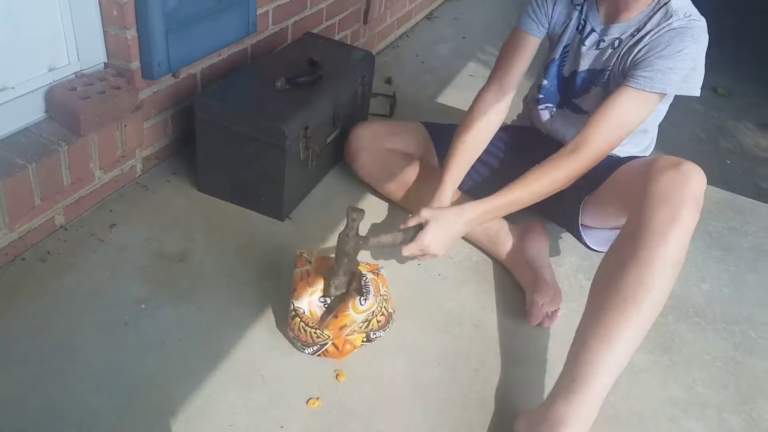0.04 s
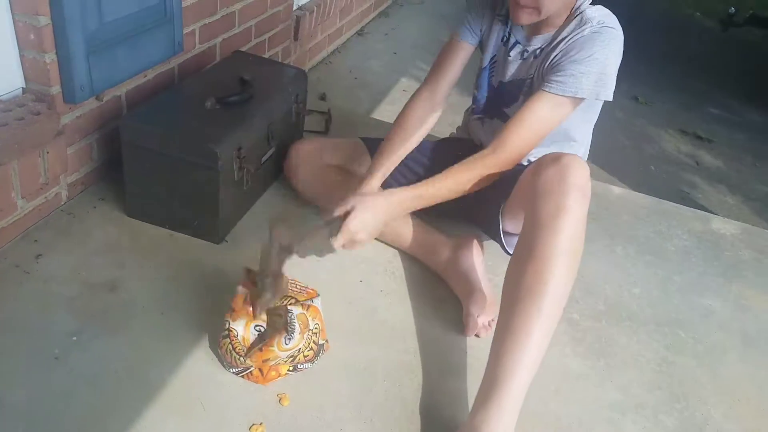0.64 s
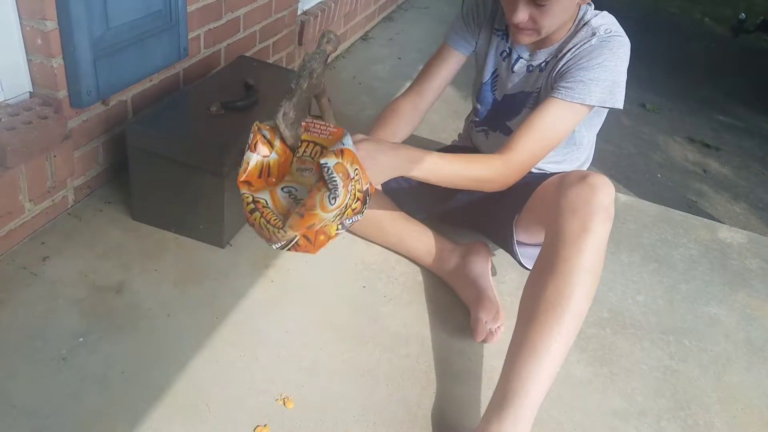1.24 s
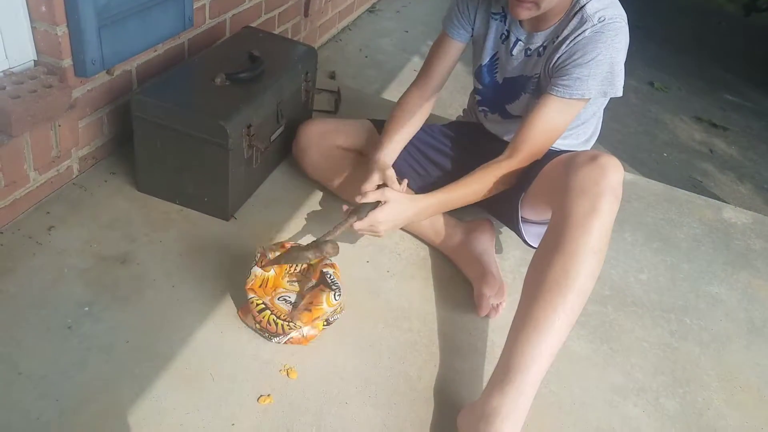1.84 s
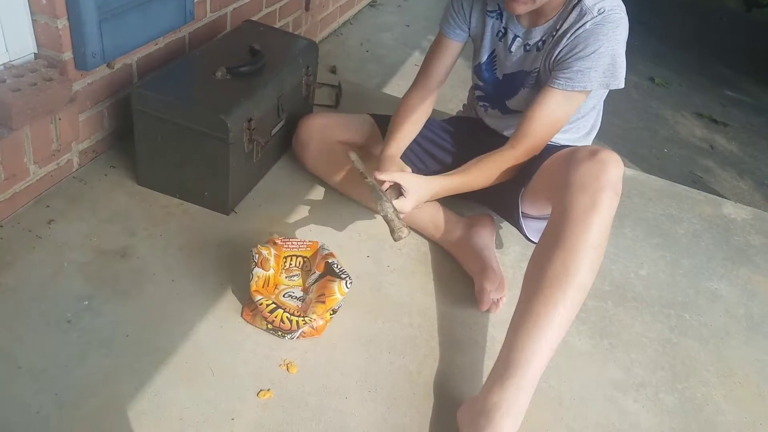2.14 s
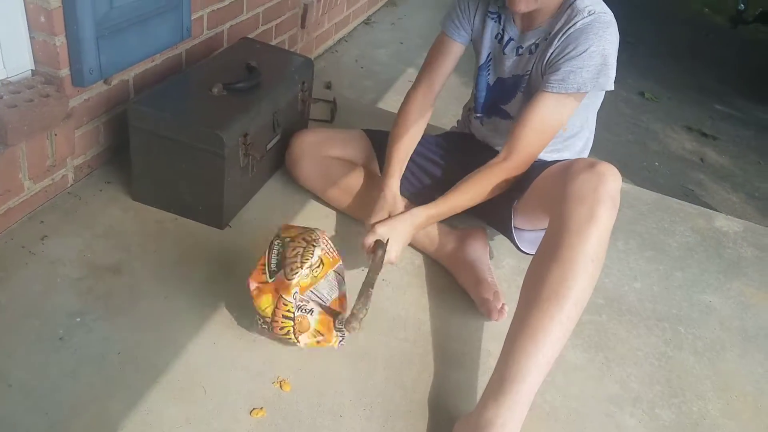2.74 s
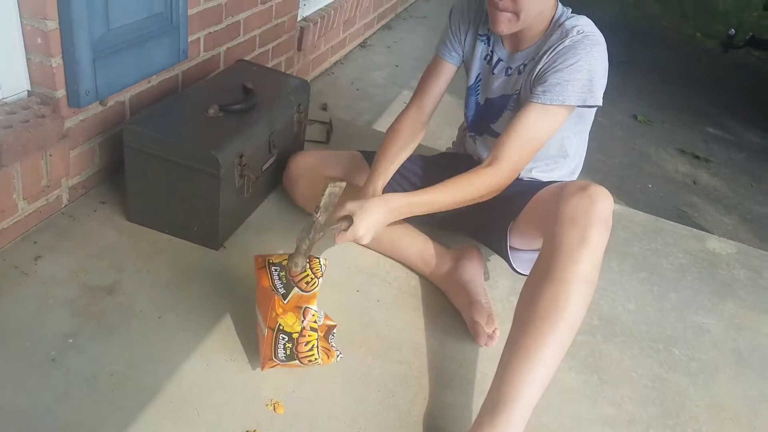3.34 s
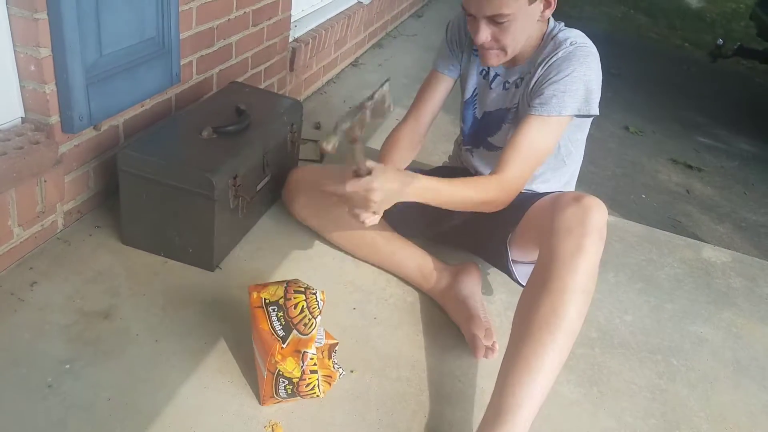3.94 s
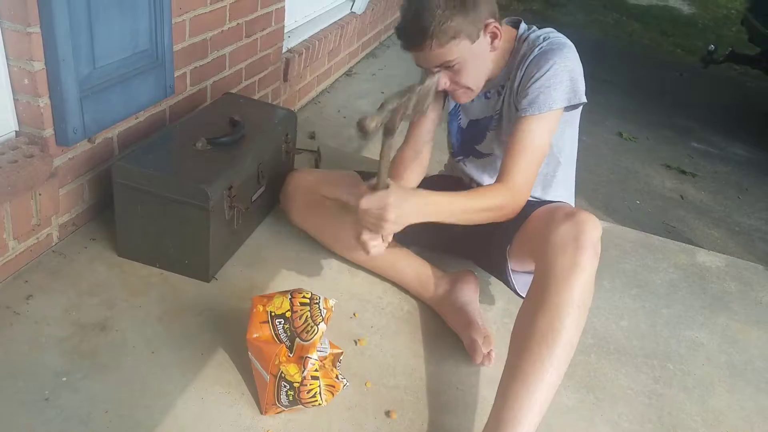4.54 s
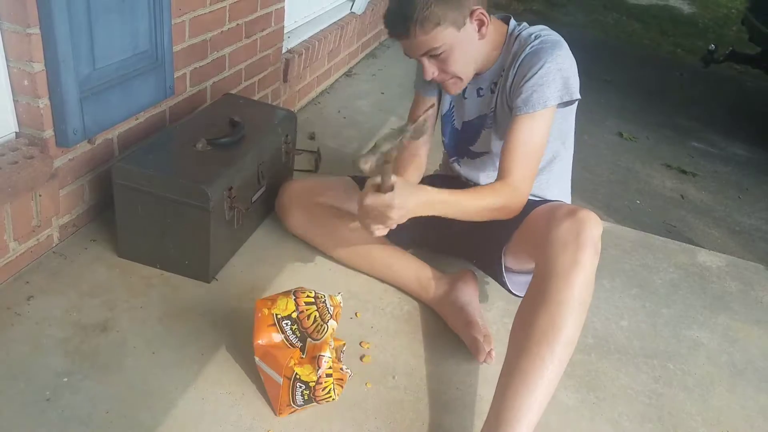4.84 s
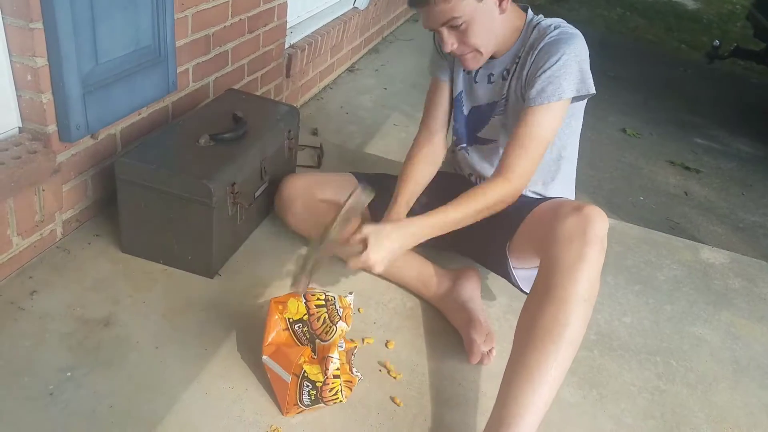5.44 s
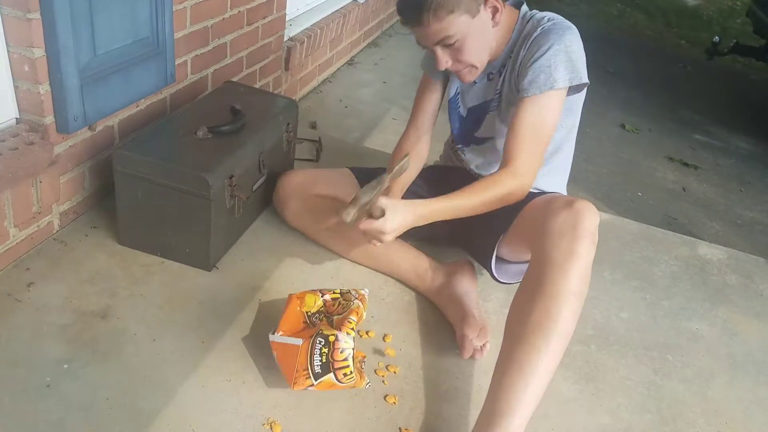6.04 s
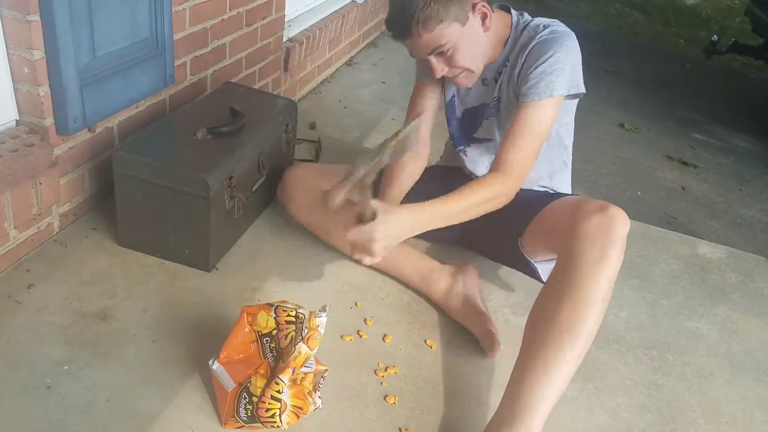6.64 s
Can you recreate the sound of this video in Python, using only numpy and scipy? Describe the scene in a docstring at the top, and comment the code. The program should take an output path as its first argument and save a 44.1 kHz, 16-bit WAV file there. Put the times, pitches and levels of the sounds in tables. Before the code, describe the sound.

A hatchet strikes a foil bag of crackers on a concrete porch right at the start, with a sharp crunch, a hollow thud and a faint steel ring, followed by a hard click. Another blow lands at 0.7 seconds, and the bag is flung up, rustling, and drops softly around 1 second. A blow at 1.5 seconds is followed by crinkling and a brief lull. At 2.7 seconds the hatchet hits again and the bag tumbles, knocking and crunching on the floor around 3 seconds. From 3.3 to 6.4 seconds come eight steady chops, about two a second, with foil crackling and crumbs ticking between them. The bag is close and slightly left, with a short echo from the wall. Far traffic hums faintly throughout, and a distant engine idles, then pulls away from about 4.6 seconds.

```python
"""Far traffic hums and a distant engine idles as a hatchet chops a foil bag of crackers on a concrete porch.
The steel rings on the first blow. The bag's air thuds and crackers break, echoed by a wall and the porch.
Between blows the foil crinkles and crumbs tick. At about one second, and again near three, the bag is
flung up and tumbles back. The chopping goes on, and toward the end the engine pulls off."""
import sys
import numpy as np
from scipy import signal
from scipy.fft import rfft, irfft, next_fast_len
from scipy.io import wavfile
from scipy.ndimage import map_coordinates

SR = 44100
rng = np.random.default_rng(int(sys.argv[2]) if len(sys.argv) > 2 else 0)


def log_audio(samples):
    """Write samples as a 16-bit WAV file to the path given in sys.argv[1]."""
    # one column per channel
    frames = np.atleast_2d(samples).T
    # limit to full scale, then quantise
    limited = np.clip(frames, -1, 1)
    pcm = np.round(limited * 32767).astype(np.int16)
    wavfile.write(sys.argv[1], SR, pcm)


N = 295690
AGE = np.arange(SR * 2 // 5) / SR  # seconds since a hit

# how loud the far traffic is: (time [s], level [dB])
TRAFFIC_LEVELS = [(0, -52), (.6, -63.5), (1.4, -64), (2, -56), (3, -54.5), (3.7, -65.5), (4.6, -62.5),
                  (6.7, -52.5)]
# the traffic's deep tone: (frequency [Hz], level [dB])
TRAFFIC_TONE = [(20, -24.5), (45, 0), (80, 1), (130, -6.5), (300, -13), (1000, -22.5), (3000, -26.5),
                (6000, -29.5), (8000, -45.5), (10500, -34.5), (16000, -47)]
# the distant engine: (time [s], firing rate [Hz], level [dB])
ENGINE = [(0, 41.5, -69.5), (1.5, 42.1, -63), (2.5, 39.9, -54), (3.3, 40.6, -54.5), (3.65, 47.6, -60),
          (4.2, 43.2, -74), (4.65, 57.1, -64), (5, 73.2, -56.5), (5.6, 77.6, -54), (6.7, 86.6, -53)]
# the steel's ring on the first blow, and foil tearing: (time [s], level [dB], pitch [Hz], fade time [s])
BRIGHT_BURSTS = [(.0005, -40, 5550, 0.32), (0.0393, 3.5, 5300, 0.003), (0.737, -15, 11800, 0.028),
                 (0.929, -12, 2330, 0.0039), (1.873, -29.5, 5500, 0.011), (4.707, -8, 10620, 0.0056),
                 (4.884, -23.5, 2350, 0.0053), (5.29, -26, 2920, 0.0088), (6.351, -24, 6130, 0.0036)]
# the tone of the bright bursts and crumples: (frequency [Hz], level [dB])
BRIGHT_TONE = [(500, -0.5), (2500, 1.5), (5500, 4), (8000, -16), (10500, -8), (16000, -18)]
# how long the porch echoes: (frequency [Hz], time to fade by 60 dB [s])
PORCH_ECHO = [(150, 0.48), (900, 0.21), (2500, 0.23), (6000, 0.19), (14000, 0.17)]
# hatchet blows: (time [s], crunch [dB], thud [dB], low push [dB], crush time [s], air pocket pitch [Hz])
BLOWS = [(0.035, -15, -19, -39, 0.05, 311), (.723, -21, -25, -31, 0.042, 276.5),
         (1.5, -25, -50, -51, 0.071, 350), (1.521, -20.5, -26, -49.5, 0.056, 487),
         (2.731, -17, -23.5, -32.5, 0.076, 445.6), (3.2529, -17, -19.5, -45.5, 0.056, 467),
         (3.7383, -19, -22.5, -37, 0.039, 403), (4.2214, -21.5, -20, -43, 0.035, 410),
         (4.6904, -23, -22, -39, 0.023, 389), (5.1239, -19.5, -21.5, -40.5, 0.024, 556),
         (5.5409, -20.5, -25, -39, 0.027, 364), (5.956, -20, -24, -67, 0.038, 308),
         (6.366, -21, -22, -53, 0.063, 405)]
# bag and porch ring under a blow: (pitch [Hz], level [dB], time to fade by 60 dB [s])
THUD_NOTES = [(208.5, 0, 0.21), (269.6, -1, 0.16), (340.6, 6, 0.077), (375.3, 5.5, 0.11), (495, 6, 0.064),
              (748, 0.5, 0.08), (865, -2, 0.2)]
# the tone of breaking crackers: (frequency [Hz], level [dB])
CRUNCH_TONE = [(150, -34), (500, -23), (1000, -5), (1600, 1.5), (2300, 2.5), (3200, -1), (4500, 1.5),
               (5400, -2.5), (6300, -8.5), (7200, -19.5), (8300, -22.5), (10000, -16), (12500, -22.5),
               (16000, -29.5)]
# the tone of the slap on the bag: (frequency [Hz], level [dB])
SLAP_TONE = [(80, -22), (300, -5.5), (560, -4), (680, -8.5), (820, 0.5), (950, -2.5), (1080, 1.5),
             (1400, -4.5), (2200, -7.5), (6000, -50.5)]
# the bag is tugged, carried or tumbling: (time [s], length [s], sliding crackers [dB], creasing foil [dB])
BAG_MOVES = [(0.201, 0.014, -33, -38), (0.817, 0.054, -38, -35), (0.975, 0.048, -40, -43.5),
             (1.095, 0.35, -45.5, -55), (1.167, 0.041, -39, -51.5), (1.642, 0.036, -32.5, -36.5),
             (1.69, 0.15, -51, -57), (1.832, 0.027, -40, -38), (2.759, 0.17, -26, -31.5),
             (2.972, 0.092, -28, -34), (3.398, 0.01, -33, -40), (3.524, 0.28, -54, -87),
             (3.815, 0.15, -39.5, -66), (4.022, 0.25, -49, -71), (4.34, 0.045, -39.5, -63),
             (4.498, 0.026, -50.5, -54.5), (4.839, 0.12, -39.5, -45.5), (5.269, 0.077, -47, -44.5),
             (5.67, 0.13, -39.5, -40), (6.047, 0.044, -41.5, -46), (6.142, 0.065, -43, -45),
             (6.254, 0.047, -41.5, -37), (6.5, 0.088, -44.5, -41)]
# how hard the air pocket rings, least while the bag hangs on the blade: (time [s], level [dB])
POCKET_LEVELS = [(1, 7), (1.1, -7), (1.5, -13.5), (1.8, -3), (2.8, 11.5), (3.1, 0.5), (5.7, 8.5)]
# the tone of the rustling bag: (frequency [Hz], level [dB])
RUSTLE_TONE = [(100, -27.5), (260, -2.5), (460, 1.5), (610, -3.5), (920, 8), (1400, 2.5), (2300, -1.5),
               (3500, -6), (5500, -4), (6500, -16), (8200, -27.5), (10000, -16.5), (16000, -32)]
# a dry, hard click shortly after a blow: (time [s], level [dB], pitch [Hz])
HARD_CLICKS = [(.1505, -6.5, 1100), (.929, -18.5, 750)]
# a crease crumples: (time [s], level [dB], fade time [s])
CRUMPLES = [(0.155, -31, 0.016), (0.184, -28, 0.0073), (0.215, -34.5, 0.023), (0.849, -34.5, 0.02),
            (3.213, -40, 0.021), (4.193, -33, 0.0026), (4.367, -32.5, 0.0046), (4.481, -40, 0.0069),
            (4.928, -33.5, 0.0029), (5.745, -30, 0.014), (6.243, -33.5, 0.014), (6.59, -32, 0.011)]
# a crease flips or a cracker knocks: (time [s], level [dB], pitch [Hz])
SNAPS = [(0.326, -25, 700), (.447, -33, 840), (.501, -36.5, 1860), (0.604, -29.5, 1083), (3.198, -16, 965),
         (3.976, -22, 1400), (4.055, -22, 923), (4.133, -23, 2100), (4.841, -18, 977), (5.809, -31, 560),
         (5.855, -22, 2100), (6.281, -18.5, 460)]
# the microphone's dip near 8 kHz, which softens the snaps: (frequency [Hz], level [dB])
MICROPHONE_DIP = [(300, -2), (5500, -0.5), (7000, -10.5), (8200, -8.5), (10000, -3), (16000, -3.5)]
# the flung bag lands: (time [s], crunch [dB], knock [dB], crush time [s], air pocket pitch [Hz])
LANDINGS = [(1.044, -53, -46, 0.01, 467), (2.865, -26, -27.5, 0.02, 448), (2.986, -28.5, -36.5, 0.069, 460),
            (3.036, -36.5, -34, 0.036, 450)]
# the landing bag rings: (pitch [times the air pocket's], level [dB], time to fade by 60 dB [s])
LANDING_NOTES = [(.75, -1, 0.076), (1, 8.5, 0.053), (1.8, -5, 0.17)]
# where the bag sits between the ears: (frequency [Hz], left minus right [dB])
BALANCE = [(100, -1), (380, -4), (700, -1), (1300, -0.5), (2400, 7), (4300, 0.5), (5500, 9), (8000, 2.5),
           (15000, 7.5)]


def amp(db):
    """Turn decibels into a number to multiply by."""
    return 10 ** (np.asarray(db) / 20)


def unit(x):
    """Scale a sound to an average strength (rms) of 1."""
    return x / np.sqrt(np.mean(x ** 2) + 1e-20)


def unit_burst(x):
    """Scale a sound so its first twentieth of a second has strength 1."""
    return x / np.sqrt(np.mean(x[..., :SR // 20] ** 2) + 1e-20)


def along(points, hz):
    """Read a (frequency, value) table at hz, with octaves evenly spaced."""
    frequencies, values = np.transpose(points)
    return np.interp(np.log(hz + 1), np.log(frequencies + 1), values)


def curves(rows):
    """Join a table's rows into one curve for each column after the time."""
    times, *columns = np.transpose(rows)
    return [np.interp(np.arange(N) / SR, times, column) for column in columns]


def wobble(rate):
    """A smooth random curve through rate points a second."""
    return map_coordinates(rng.standard_normal(int(N * rate / SR) + 4), [np.arange(N) * rate / SR])


def filtered(x, response):
    """Turn each frequency up or down by response(hz)."""
    n = x.shape[-1]
    padded = next_fast_len(n + SR // 5)
    return irfft(rfft(x, padded) * response(np.fft.rfftfreq(padded, 1 / SR)), padded)[..., :n]


def convolved(x, echo):
    """Give every sample of x the same echo, keeping the length of x."""
    return signal.fftconvolve(np.atleast_2d(x), np.atleast_2d(echo), axes=1)[:, :x.shape[-1]]


def coloured(x, tone, size=2048):
    """Shape a sound with a tone table, keeping its hits sharp."""
    cepstrum = irfft(np.log(amp(along(tone, np.fft.rfftfreq(size, 1 / SR)))))
    cepstrum[1:size // 2] *= 2
    cepstrum[size // 2 + 1:] = 0  # so nothing rings before a hit
    return convolved(x, irfft(np.exp(rfft(cepstrum))))


def add(track, s, x):
    """Mix x into the track at s seconds."""
    part = track[:, max(0, round(s * SR)):][:, :x.shape[-1]]
    part += x[..., :part.shape[-1]]


def swell(rise, fall):
    """A loudness curve that builds up and dies away; times in seconds."""
    return (1 - np.exp(-AGE / rise)) * np.exp(-AGE / fall)


def cracks(n, rate, spread_db):
    """Tiny random clicks, about rate a second, some larger than the rest."""
    sizes = amp(spread_db * np.clip(rng.standard_normal(n), -2, 2)) * rng.choice([-1, 1], n)
    return unit(sizes * (rng.random(n) < rate / SR))


def ring(notes, attack, scatter_db):
    """A struck thing rings with fading notes, at new strengths each time."""
    hz, db, fade_s = np.transpose(notes)[:, :, None]
    level = db + scatter_db * rng.standard_normal(hz.shape)
    phase = 2 * np.pi * rng.random(hz.shape)
    waves = amp(level) * np.exp(-np.log(1000) * AGE / fade_s) * np.sin(2 * np.pi * hz * AGE + phase)
    return waves.sum(axis=0) * (1 - np.exp(-AGE / attack))


def traffic_and_engine():
    """Far traffic hums; only the two lowest notes of one engine's firing carry this far."""
    firing_hz, engine_db = curves(ENGINE)
    phase = 2 * np.pi * np.cumsum(firing_hz * (1 + 0.0032 * wobble(6.1))) / SR
    exhaust = np.sin(phase) + np.sin(2 * phase) / (1 + (firing_hz / 55) ** 6)
    engine = amp(engine_db + wobble(2.5)) * exhaust
    mid, side = rng.standard_normal((2, N))
    side = filtered(side, lambda hz: (hz + 120) / (hz + 600))  # bass is nearly alike in both ears
    traffic = unit(coloured(np.array([mid + side, mid - side]), TRAFFIC_TONE))
    traffic_db, = curves(TRAFFIC_LEVELS)
    return engine + amp(traffic_db + wobble(2.4)) * traffic


def bright_bursts():
    """Short bright bursts of tiny clicks: the steel's ring on the first blow, and foil tearing."""
    out = np.zeros((2, N))
    for s, db, hz, fade_s in BRIGHT_BURSTS:
        clicks = np.exp(-AGE / fade_s) * cracks(len(AGE), rate=1300, spread_db=1)
        burst = scattered(clicks, wall_db=-20.5, tail_db=-8.5, spots=2)
        band = signal.butter(2, [max(hz - 1700, 200), hz + 1300], "band", fs=SR)
        add(out, s, amp(db) * signal.lfilter(*band, burst))
    return coloured(out, BRIGHT_TONE)


def porch(wall_db, tail_db, wall_delay_s=.0068, ear_gap_s=0.00031, build_s=0.00039):
    """A click arrives straight (left ear first), then off the brick wall and as a blur of echoes."""
    hz, t, noise = signal.stft(rng.standard_normal((2, len(AGE))), SR, nperseg=256)
    shared = 1 / (1 + (hz[:, None] / 650) ** 4)  # long waves reach both ears alike
    noise = np.array([noise[0], shared * noise[0] + np.sqrt(1 - shared ** 2) * noise[1]])
    fade = np.exp(-np.log(1000) * t / along(PORCH_ECHO, hz)[:, None])
    tail = signal.istft(noise * fade, SR, nperseg=256)[1][:, :len(AGE)]
    tail = tail * (1 - np.exp(-AGE / build_s))
    echo = amp(tail_db) * tail / np.linalg.norm(tail[0])
    # each spot on the bag has slightly different delays
    straight_at = [0, round(ear_gap_s * rng.uniform(.75, 1.35) * SR)]
    wall_at = wall_delay_s * rng.uniform(.85, 1.15) * SR + np.array([0, ear_gap_s * SR])
    echo[[0, 1], straight_at] += 1
    echo[[0, 1], wall_at.astype(int)] += amp(wall_db)
    return echo / np.linalg.norm(echo[0])


def scattered(clicks, wall_db, tail_db, spots):
    """Clicks come from several spots on the bag, each with its own echoes."""
    spot = rng.integers(spots, size=len(clicks))
    return sum(convolved(clicks * (spot == k), porch(wall_db, tail_db)) for k in range(spots))


def chops():
    """The hatchet slaps the bag, the trapped air thumps and crackers break."""
    out = np.zeros((2, N))
    for s, crunch_db, thud_db, push_db, crush_s, pocket_hz in BLOWS:
        add(out, s, amp(crunch_db) * crushing(crush_s))
        # the air pocket rings briefly and drives the notes nearest its own pitch hardest
        notes = [(hz, db - 8.5 * abs(np.log2(hz / pocket_hz)), fade_s) for hz, db, fade_s in THUD_NOTES]
        notes.append((pocket_hz, 9, .042))
        thud = amp(thud_db) * unit_burst(ring(notes, attack=0.006, scatter_db=1.5))
        push = amp(push_db) * unit_burst(np.sin(2 * np.pi * 128 * AGE) * swell(0.0021, 0.012))
        add(out, s, thud + push)
        # a soft low boom comes back from farther along the house
        boom = unit_burst(np.sin(2 * np.pi * 214 * AGE) * swell(0.012, 0.078))
        add(out, s + 0.068, amp(thud_db - 24.5) * boom)
    return out


def crushing(crush_s, slap_db=1.04):
    """Crackers break and the foil buckles with a slap; a larger crush_s draws both out."""
    last_layer = 0.08 * np.exp(-((AGE - .009) / 0.0023) ** 2)  # crushed against the floor
    breaking = swell(0.011 * crush_s, 0.4 * crush_s) + last_layer
    breaking *= cracks(len(AGE), rate=3400, spread_db=5.5)
    crunch = coloured(scattered(breaking, wall_db=0, tail_db=3, spots=7), CRUNCH_TONE)
    buckling = swell(0.012 * crush_s, 0.52 * crush_s) + last_layer / 2
    buckling *= cracks(len(AGE), rate=4000, spread_db=6)
    slap = coloured(scattered(buckling, wall_db=-19, tail_db=-6.5, spots=3), SLAP_TONE)
    return unit_burst(crunch) + amp(slap_db) * unit_burst(slap)


def crinkle(pocket_hz=410, wander_octaves=0.081):
    """Crackers slide in a dull wash and ring the air pocket; creases give way in bright clumps."""
    sliding = signal.lfilter(*signal.butter(1, 2400, fs=SR), cracks(N, rate=2000, spread_db=3))
    bunching = amp(2.5 * np.minimum(wobble(90), 1.5))
    clumps = unit(cracks(N, rate=310, spread_db=3) * bunching)
    creases = signal.lfilter(*signal.butter(1, 2400, "high", fs=SR), clumps)
    bumps = amp(curves(POCKET_LEVELS)[0]) * cracks(N, rate=200, spread_db=2)
    slide_gain, crease_gain = bag_motion()
    clicks = np.array([slide_gain * sliding, crease_gain * creases, slide_gain * bumps])
    out = np.zeros((2, N))
    step = SR // 4
    for start in range(0, N, step):  # the moving bag keeps changing its pitch and echoes
        inside, outside, bumping = np.pad(clicks[:, start:start + step], ((0, 0), (0, step)))
        hz = pocket_hz * 2 ** (wander_octaves * rng.standard_normal())
        pocket = signal.lfilter(*signal.iirpeak(hz, 4, fs=SR), bumping)
        add(out, start / SR, scattered(inside + pocket, wall_db=-15.5, tail_db=-1, spots=2))
        add(out, start / SR, scattered(outside, wall_db=-18.5, tail_db=-1, spots=2))
    return amp(6) * coloured(out, RUSTLE_TONE)


def bag_motion(rise_share=0.089, fade_s=0.047, settle_db=-15, settle_s=0.097, flutter_db=7):
    """How strongly crackers slide and foil creases as the bag moves, or settles after a blow."""
    t = np.arange(N) / SR
    power = np.zeros((2, N))
    for s, length, sliding_db, creasing_db in BAG_MOVES:
        age = np.maximum(t - s, 0)
        rise = 1 - np.exp(-age / (rise_share * length))  # a longer move starts more softly
        fall = np.exp(-np.maximum(age - length, 0) / fade_s)
        power += np.outer(amp([sliding_db, creasing_db]), rise * fall) ** 2
    for s, crunch_db, *_ in BLOWS:
        power += (amp(crunch_db + settle_db) * (t > s) * np.exp(-np.abs(t - s) / settle_s)) ** 2
    return np.sqrt(power) * amp(flutter_db * np.tanh(wobble(55)))  # foil gives way in fits and starts


def hard_clicks():
    """A single dry, hard click, about one wave long, comes shortly after a blow."""
    out = np.zeros((2, N))
    for s, db, hz in HARD_CLICKS:
        cycles = AGE * hz
        click = np.sin(2 * np.pi * cycles) * np.exp(-((cycles - 3 / 4) / .5) ** 2)
        add(out, s, amp(db) * convolved(click, porch(wall_db=-20, tail_db=-10.5)))
    return out


def crumples():
    """A crease collapses in a short spray of tiny clicks."""
    out = np.zeros((2, N))
    for s, db, fade_s in CRUMPLES:
        spray = np.exp(-AGE / fade_s) * cracks(len(AGE), rate=2000, spread_db=1.5)
        add(out, s, amp(db) * scattered(spray, wall_db=-17.5, tail_db=-7, spots=2))
    return coloured(out, BRIGHT_TONE)


def snaps():
    """A crease flips or a cracker knocks: a brief ring and a short crackle."""
    out = np.zeros((2, N))
    for s, db, hz in SNAPS + crumb_ticks(count=200):
        pop = np.sin(2 * np.pi * hz * AGE) * np.exp(-AGE * hz / 0.78)
        crackle = coloured(rng.standard_normal(len(AGE)) * np.exp(-AGE / 0.0006), RUSTLE_TONE)
        add(out, s, amp(db) * convolved(pop + amp(-5.5) * crackle, porch(wall_db=-12, tail_db=-6)))
    return coloured(out, MICROPHONE_DIP)


def crumb_ticks(count, boost_db=11, low_hz=650, high_hz=3186):
    """Random ticks, louder when the crackers slide more: (time [s], level [dB], pitch [Hz])."""
    slide_gain = bag_motion()[0]
    when, pitch = rng.random((count, 2)).T
    sliding_db = 20 * np.log10(slide_gain[(when * N).astype(int)] + 1e-9)
    db = sliding_db + boost_db + 2.5 * rng.uniform(-1.6, 1, count)
    return list(zip(when * N / SR, db, low_hz * (high_hz / low_hz) ** pitch))


def landings():
    """The bag drops on the concrete with a hollow knock and its crackers crash together."""
    out = np.zeros((2, N))
    for s, crunch_db, knock_db, crush_s, pocket_hz in LANDINGS:
        notes = [(ratio * pocket_hz, db, fade_s) for ratio, db, fade_s in LANDING_NOTES]
        knock = unit_burst(ring(notes, attack=.001, scatter_db=1.5))
        add(out, s, amp(crunch_db) * crushing(crush_s) + amp(knock_db) * knock)
    return out


def scene():
    """Mix it all; the bag lies to the left, so its high sounds are louder there."""
    bag = chops() + hard_clicks() + landings() + crinkle() + snaps() + crumples() + bright_bursts()
    placed = filtered(bag, lambda hz: amp(np.outer([.5, -.5], along(BALANCE, hz))))
    return placed + traffic_and_engine()


def record(dry, low_cut_hz=47, top_hz=16200):
    """The recorder thins the deepest bass, rounds off the loudest peaks and cuts the highest treble."""
    thinned = signal.lfilter(*signal.butter(2, low_cut_hz, "high", fs=SR), dry)
    rounded = thinned / (1 + np.abs(thinned) ** 6) ** (1 / 6)
    return filtered(rounded, lambda hz: 1 / (1 + (hz / top_hz) ** 120))


dry = scene()
out = record(dry)
log_audio(out)
```